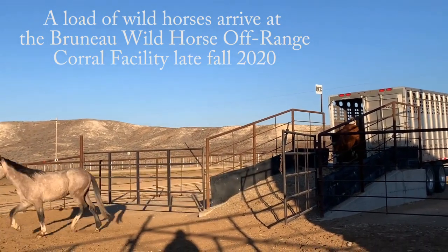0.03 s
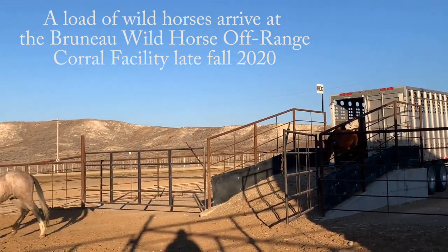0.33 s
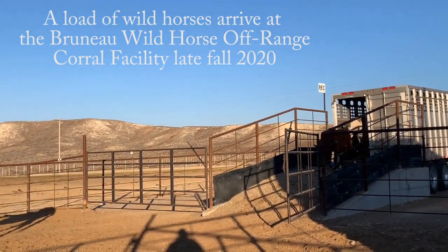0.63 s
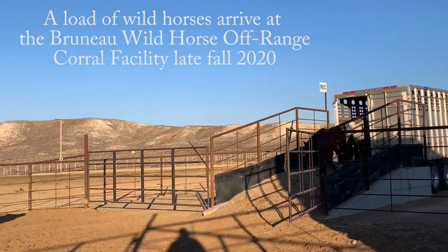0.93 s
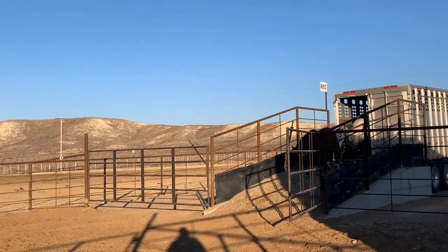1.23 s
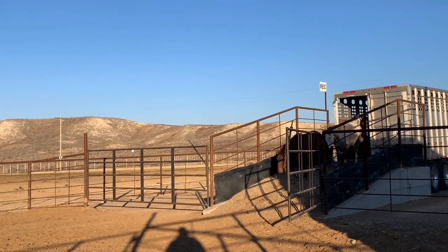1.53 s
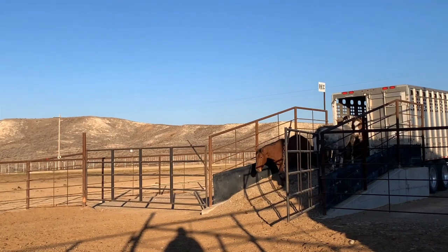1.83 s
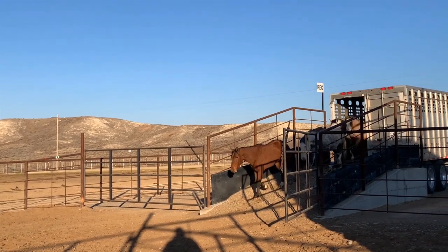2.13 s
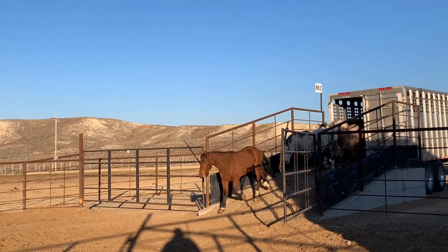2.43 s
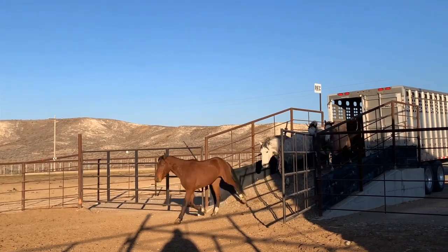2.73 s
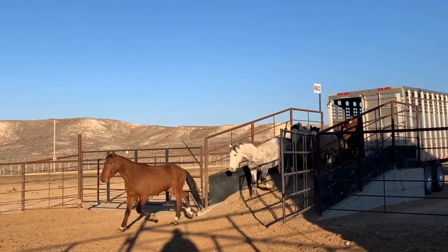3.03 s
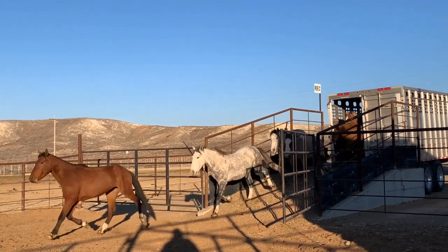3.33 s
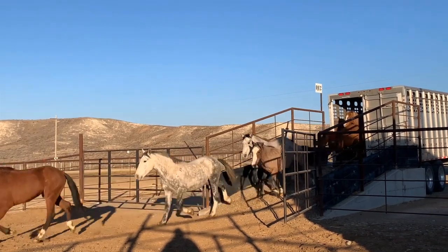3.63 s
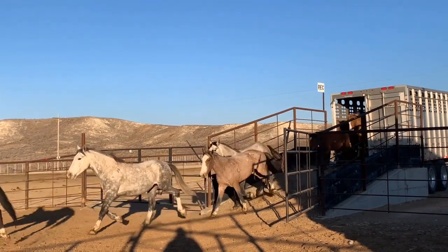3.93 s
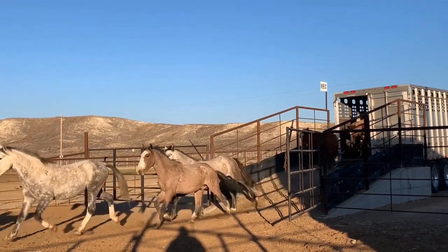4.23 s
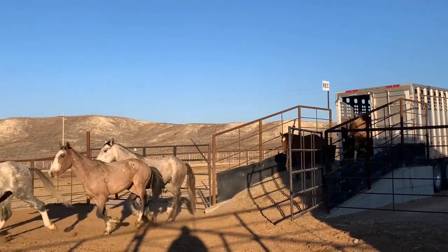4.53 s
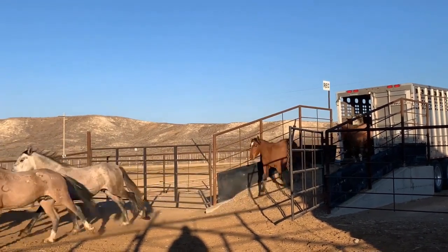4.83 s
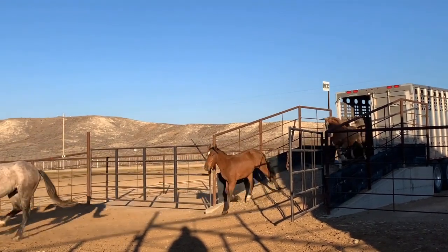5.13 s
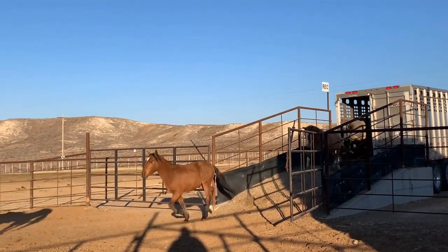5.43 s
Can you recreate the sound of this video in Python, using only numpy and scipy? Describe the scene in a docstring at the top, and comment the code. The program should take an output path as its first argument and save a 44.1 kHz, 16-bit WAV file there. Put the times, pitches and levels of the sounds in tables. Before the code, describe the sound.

Horses shuffle in a metal stock trailer, their hooves clopping lightly on the ramp and thumping on the deck. Then bouts of hard stamping make the floor boom and the walls rattle and bang, with the loudest near the end. Hooves crunch the dirt of the outdoor corral and spray sand to the right. Off to the left, a horse gives a hoarse squeal that turns clear and wavering. The stereo sound has a faint hiss underneath.

```python
"""A dirt corral, where horses crowd out of a metal stock trailer and down its ramp.
Hooves clop on the ramp and thump on the deck; in bouts of stamping the deck booms and the walls
rattle and bang. Scuffing hooves crunch clods and spray sand to the right, and a pipe rail rings faintly.
Off to the left a squeal starts hoarse, then clears and wavers."""
import sys
import numpy as np
from scipy import signal
from scipy.fft import rfft, irfft
from scipy.io import wavfile
from scipy.ndimage import uniform_filter1d

SR = 44100
rng = np.random.default_rng(int(sys.argv[2]) if len(sys.argv) > 2 else 0)


def transcribe(u):
    """Save the signal u as a 16-bit wav file named by the first command-line argument.

    u: samples, shape (n,) or (channels, n), limited to [-1, 1]; the rate is SR.
    q: integer samples, one column per channel.
    """
    v = np.clip(np.atleast_2d(u).T, -1, 1)
    q = np.round(v * 32767).astype(np.int16)
    wavfile.write(sys.argv[1], SR, q)


N = 246519
TIME = np.arange(N) / SR
FREQS = np.maximum(np.arange(N // 2 + 1) * SR / N, 1)

# Hoof on the ramp, weight on the deck. Each row: start in seconds, peak in dB, pitch in Hz.
RAMP_CLOPS = [(0.309, -47.5, 600), (0.338, -46.5, 620), (0.368, -46, 610), (0.524, -43.5, 604),
              (0.626, -51, 530), (0.747, -40.5, 687), (0.8, -41.5, 587), (0.965, -49.5, 630),
              (1.195, -43.5, 606), (1.228, -41, 540), (1.308, -38.5, 634), (1.44, -37.5, 560),
              (1.454, -43.5, 604), (1.658, -42.5, 540), (1.881, -23, 600), (2.045, -36.5, 570),
              (2.077, -40, 485), (2.156, -32, 585), (2.285, -40, 580), (2.319, -37.5, 663),
              (3.455, -36.5, 775)]
DECK_THUMPS = [(0.055, -47, 130), (0.552, -38, 173), (0.641, -41.5, 88), (0.75, -45, 119),
               (1.059, -40.5, 119), (1.122, -38, 106), (1.186, -30, 180), (1.314, -38, 168),
               (1.454, -34, 100), (1.601, -35, 192), (1.885, -28, 107), (1.899, -24, 183),
               (2.043, -39, 116), (2.154, -33, 139), (2.538, -13, 212), (2.559, -17.5, 139),
               (2.609, -29, 87), (2.677, -19.5, 247), (2.757, -18.5, 273), (2.838, -23.5, 146),
               (3.144, -31, 199), (3.234, -19.5, 177), (3.287, -22.5, 79), (3.327, -23.5, 159.5),
               (3.673, -26.5, 219), (3.698, -22, 211), (3.72, -27.5, 68), (4.66, -20, 72),
               (4.674, -14, 158.5), (4.72, -15.5, 167), (4.755, -12, 205), (4.785, -8.5, 151.6),
               (4.943, -1.5, 184.7), (4.992, -6, 209), (5.044, -14.5, 128), (5.192, -17.5, 186),
               (5.371, -22.5, 190), (5.51, -36, 143)]
# Hard stamping. Each row: start and end in seconds, levels of chassis, deck, panel and rattle in dB,
# sag of the boom in dB per second.
STAMPING_BOUTS = [ (2.528, 2.855, -29, -28.5, -39.5, -44.5, 17.5), (3.231, 3.46, -37, -35, -48.5, -49, 16),
                  (3.664, 3.806, -34.5, -35, -40.5, -42.5, 24),
                  (4.626, 4.838, -32.5, -20.5, -36, -43.5, 1.5),
                  (4.844, 4.955, -32.5, -27.5, -39, -42.5, 54), (4.946, 5.408, -20, -17.5, -30, -33, 43)]
# Blows on metal. Each row: start in seconds, level in dB, seconds to fade by 60 dB (t60).
WALL_KICKS = [(2.5324, -25.5, 0.33), (2.5609, -24.5, 0.21), (2.756, -36.5, 0.17), (3.6674, -62, 0.11),
              (3.706, -34, 0.073), (4.68, -34.5, 0.12), (4.75, -33.5, 0.15), (4.9351, -21.5, 0.28),
              (4.9559, -20.5, 0.19), (4.9759, -16.5, 0.13), (5.013, -21, 0.23)]
RAIL_KNOCKS = [(0.179, -66, 0.59), (0.7452, -67, 0.41), (1.2444, -70, 0.41), (1.859, -62, 0.42)]
# Hoof on stone or steel. Each row: start in seconds, tick in dB, body in dB, t60 in seconds.
HOOF_CLACKS = [(0.327, -70, -59.5, 0.14), (2.1032, -33, -58, 0.042), (2.5, -17.5, -55, 0.025),
               (3.709, -35.5, -53, 0.06), (3.906, -38, -68, 0.045), (4.099, -41, -65, 0.075),
               (5.351, -44, -36.5, 0.047), (5.3956, -41.5, -36.5, 0.054)]
# Hoof scuffing dirt. Each row: start in seconds, sand spray in dB, crunch in dB, t60 in seconds.
DIRT_SCUFFS = [(0.043, -81, -59.5, 0.2), (0.173, -58, -49, 0.41), (0.223, -59, -50.5, 0.21),
               (0.683, -55, -54.5, 0.39), (0.743, -44, -39.5, 0.22), (1.2186, -68, -52.5, 1),
               (1.2904, -49, -41.5, 0.1), (1.83, -48, -50, 0.34), (1.8886, -49.5, -39, 0.24),
               (2.1, -47, -46.5, 0.17), (2.1554, -47, -45.5, 0.16), (2.203, -49.5, -51.5, 0.17),
               (2.4857, -28, -36.5, 0.19), (2.503, -35.5, -32, 0.42), (2.722, -49.5, -47.5, 0.64),
               (3.11, -43.5, -77, 0.19), (3.396, -56, -38, 0.22), (3.5135, -44, -47, 0.11),
               (3.71, -46, -29.5, 0.11), (3.8525, -46, -56, 0.13), (3.979, -40.5, -54.5, 0.11),
               (4.415, -48, -58, 0.064), (4.465, -55, -79, 0.13), (4.513, -56, -53, 0.19),
               (4.6, -47, -43, 0.075), (4.9444, -24, -15.5, 0.36), (5.287, -52, -50, 0.38),
               (5.555, -62, -80.5, 0.13)]
# Hoof dragged through clods. Each row: start in seconds, length in seconds, crunch in dB.
HOOF_DRAGS = [(0.464, 0.16, -70), (1.037, 0.27, -71), (1.41, 0.26, -71.5), (2.313, 0.2, -58.5),
              (3.06, 0.23, -65), (3.792, 0.48, -72)]
# The long, clear squeal. Each row: time in seconds, pitch in Hz, level in dB.
SQUEAL_PATH = [(4.26, 1594, -61), (4.28, 1770, -49), (4.316, 1757, -49.5), (4.4, 1990, -58.5),
               (4.466, 1753, -52), (4.53, 1992, -57.5), (4.576, 1732, -47), (4.586, 1608, -53),
               (4.616, 1746, -41.5), (4.66, 1930, -35.5), (4.7, 1730, -42)]
# Short squeals. Each row: start and length in seconds, middle pitch in Hz, share by which the ends
# lie higher, lower voice in dB, upper voice in dB.
YELPS = [(3.361, 0.041, 1326, 0.05, -39.5, -52.5), (3.403, 0.0478, 1342, 0.06, -36, -44),
         (3.754, 0.039, 1405, 0.058, -33.5, -42.5), (4.751, 0.056, 1765, -0.088, -34.5, -63)]

# Fader moves. Each row: time in seconds, level in dB.
SHUFFLE_LEVEL = [(0, -57.5), (0.45, -50.5), (0.6, -48.5), (0.92, -55), (1.25, -45), (1.39, -54.5),
                 (1.57, -43), (1.8, -52), (1.95, -43), (2.48, -41), (2.88, -51.5), (3.05, -49.5),
                 (3.2, -40.5), (3.5, -47), (4.0, -49), (4.49, -49), (4.6, -35.5), (5.5, -50)]  # the deck under the restless herd
SAND_LEVEL = [(1.8, -85), (2.05, -71), (2.3, -63), (2.8, -75), (3.0, -68), (3.3, -61.5), (3.9, -58),
              (4.22, -64), (4.4, -56), (4.85, -58.5), (5.2, -69.5), (5.59, -65)]  # sand stirred up in the corral
RASP_LEVEL = [(3.32, -60), (3.4, -59), (3.6, -49), (4.02, -56)]  # the hoarse part of the squeal

# The tone colour of each layer. Each row: frequency in Hz, gain in dB.
CHASSIS_EQ = [(15, -54), (25, -16.5), (45, -7.5), (60, -1), (71, 1), (85, -4), (105, -3.5), (140, -14.5),
              (300, -78.5)]
DECK_BOOM_EQ = [(50, -41.5), (100, -2.5), (140, -0.5), (210, 2.5), (260, 1), (420, -15), (600, -31),
                (900, -78)]
DECK_MURMUR_EQ = [(15, -45.5), (25, -13), (86, 3.5), (135, 0), (182, -0.5), (259, -9.5), (324, -16.5),
                  (373, -21.5), (420, -48), (550, -61), (920, -120)]
PANEL_EQ = [(180, -18.5), (300, 6.5), (370, -8), (440, 1.5), (620, 2), (820, -1), (1000, -2), (1200, -11),
            (1600, -19), (2600, -98)]
RATTLE_EQ = [(600, -37), (1000, -14), (1400, 2.5), (2000, 0), (2500, -5.5), (3500, -6.5), (5500, -16.5),
             (8000, -20), (11000, -30.5), (14000, -33), (16000, -28)]
CLACK_EQ = [(600, -11), (1400, 6), (3000, 5.5), (5000, 2), (7000, 0), (10000, -21), (16000, -28)]
CRUNCH_EQ = [(400, -38), (700, 4.5), (1000, -2.5), (1700, -2.5), (2400, -9), (3200, -8.5), (4500, -15),
             (6300, -15.5), (8000, -17), (11000, -20)]
SAND_EQ = [(4000, -34.5), (7500, -23), (8800, 3.5), (10300, 0.5), (12000, -3.5), (13500, -4.5), (15000, -7),
           (16000, -5.5)]
HISS_EQ = [(100, -2), (500, 5), (1500, 4), (5000, -7), (8000, -2), (11000, 1), (13500, 1.5), (14500, 14),
           (16000, 5.5)]
# Stereo width: centred bass, wide treble. Each row: frequency in Hz, side over mid in dB.
STEREO_WIDTH = [(250, -78), (420, -68.5), (600, -39), (1000, -7.5), (1500, -2.5), (4000, -1), (10000, 3)]

# Resonances of deck, walls and hoarse voice. Each row: frequency in Hz, width in Hz, gain in dB.
DECK_MODES = [(121.5, 34, -3), (148.3, 19.2, -1), (184, 11.5, -3.5), (214.8, 19, -5), (311, 64, -8.5),
              (440, 130, -9.5)]
WALL_MODES = [(475, 24, 1.5), (553, 63, 0), (610, 24, -21), (726, 8.1, -7.5), (771, 41, -5),
              (1360, 51, -12), (1814, 120, -2.5), (2140, 8.9, -4), (2425, 130, 4), (3220, 26, -16.5),
              (3495, 17, 0)]
RASP_MODES = [(1110, 70, -32), (1370, 25, 13), (1674, 21, 16), (1970, 53, 5), (2184, 44, -1.5),
              (2630, 79, -8), (3280, 51, 3.5)]
# The partials of the pipe rail. Each row: frequency in Hz, gain in dB.
RAIL_MODES = [(1015, 10), (1740, 8), (2420, -8), (2825, -1), (3740, -7), (5410, -28), (5935, -3.5)]


def hooves():
    """Single steps: the hard clop of the horn and the thump of the weight."""
    return knocks(RAMP_CLOPS, cycles=1.69, glide=0.24) + knocks(DECK_THUMPS, cycles=1.77, glide=0.079)


def stamping(metal_sag_ratio=1.14):
    """Bouts rock the chassis, boom in the deck and shake panels and fittings; kicks crash on top."""
    chassis = evened(coloured(grains(400, 1.5), CHASSIS_EQ), 0.035)
    deck = evened(coloured(grains(400, 1.6), DECK_BOOM_EQ, resonances(DECK_MODES)), 0.014)
    panel_ring = sheet_metal(ring_db=1, t60=0.036, bed_db=-2)
    panel = evened(coloured(scattered(1200, 1.3), PANEL_EQ, panel_ring), 0.024)
    fittings = scattered(1500, 2.2)
    out = 0
    for start, end, chassis_db, deck_db, panel_db, rattle_db, sag_db_per_s in STAMPING_BOUTS:
        # the walls ring with a slightly different random colour in each bout
        wall_ring = sheet_metal(ring_db=-4, t60=0.12, bed_db=8)
        rattle = evened(coloured(fittings, RATTLE_EQ, wall_ring), 0.011)
        boom = from_db(chassis_db) * chassis + from_db(deck_db) * deck
        metal = from_db(panel_db) * panel + from_db(rattle_db) * rattle
        # hit at once, sag steadily, stop short
        sag_db = sag_db_per_s * np.clip(TIME - start, 0, end - start)
        out = out + gate(start, end, 0.0044, 0.013) * from_db(-sag_db) * boom
        out = out + gate(start, end, 0.0048, 0.0043) * from_db(-metal_sag_ratio * sag_db) * metal
    return out + wall_kicks(panel)


def wall_kicks(panel, drum_hz=412):
    """A kick drums on the sheet metal, shakes the panel and sets off hard impacts that ring on."""
    wall_ring = sheet_metal(ring_db=-4, t60=0.17, bed_db=6)
    crash = evened(coloured(scattered(500, 2.0), RATTLE_EQ, wall_ring), 0.0054)
    drum = knocks([(start, db + 0.5, drum_hz) for start, db, _ in WALL_KICKS], cycles=2.6, glide=0.071)
    return drum + bursts(WALL_KICKS, attack=0.001) * (crash + from_db(1.5) * panel)


def clacks(left_lag_s=0.000177):
    """Hard, dry hoof contacts: a gritty tick over a short metallic body."""
    starts, tick_db, body_db, t60 = np.transpose(HOOF_CLACKS)
    grit = evened(coloured(grains(5700, 1.5), SAND_EQ), 0.003)
    metal = coloured(scattered(18000, 0), CLACK_EQ)
    tick = bursts(zip(starts, tick_db, t60), attack=0.00053) * grit
    body = bursts(zip(starts, body_db, t60), attack=0.00047) * metal
    return body + np.array([delayed(tick, left_lag_s), tick])


def dirt(left_lag_s=0.0001788, crumble_db=-80.5):
    """Hooves crush clods around the ramp and throw sand off to the right."""
    sand_db, = automation(SAND_LEVEL)
    starts, spray_db, crunch_db, t60 = np.transpose(DIRT_SCUFFS)
    drags = sum(from_db(db) * arch(start, length) for start, length, db in HOOF_DRAGS)
    crush = from_db(crumble_db) + drags + bursts(zip(starts, crunch_db, t60), attack=0.0082)
    spray = from_db(sand_db) + bursts(zip(starts, spray_db, t60), attack=0.0014)
    wall_ring = sheet_metal(ring_db=1, t60=0.043, bed_db=12)
    crunch = crush * evened(coloured(scattered(3000, 3.4), CRUNCH_EQ, wall_ring), 0.017)
    sand = spray * evened(coloured(grains(3000, 0.9), SAND_EQ), 0.015)
    return crunch + np.array([delayed(sand, left_lag_s), sand])


def squeal(right_lag_s=0.00043):
    """Hoarse noise in narrow, bending resonances, giving way to short yelps and one long, clear cry."""
    rasp_db, = automation(RASP_LEVEL)
    breath_eq = [(600, -28), (1100, 3), (3300, 1), (5000, -21)]
    breath = coloured(rng.standard_normal(N), breath_eq, resonances(RASP_MODES))
    rasp_level = gate(RASP_LEVEL[0][0], RASP_LEVEL[-1][0], 0.03, 0.027) * from_db(rasp_db)
    rasp = rasp_level * evened(wavering(breath, depth=0.018), 0.042)
    yelps = sum(yelp(*row) for row in YELPS)
    long_cry = np.sqrt(2) * cry(SQUEAL_PATH, octave_db=-31, jitter=0.009, shimmer_db=2.5)
    voice = rasp + yelps + long_cry
    return np.array([voice, delayed(voice, right_lag_s)])


def yelp(start, length, hz, bend, lower_db, upper_db, upper_ratio=1.455):
    """Two rough voices bend together along a parabola."""
    path = [(start + length * (u + 1) / 2, hz * (1 + bend * u ** 2)) for u in np.linspace(-1, 1, 5)]
    lower_path = [(s, f, lower_db) for s, f in path]
    upper_path = [(s, f * upper_ratio, upper_db) for s, f in path]
    lower = cry(lower_path, octave_db=-12, jitter=0.0169, shimmer_db=-1)
    upper = cry(upper_path, octave_db=-16, jitter=0.0156, shimmer_db=4.5)
    return lower + upper


def cry(path, octave_db, jitter, shimmer_db):
    """A thin tone with a weak octave, unsteady in pitch and strength."""
    hz, db = automation(path)
    tremble, flutter = unit_power(uniform_filter1d(rng.standard_normal((2, N)), SR // 250))
    pitch = uniform_filter1d(hz, SR // 60) * (1 + jitter * tremble)
    phase = 2 * np.pi * np.cumsum(pitch) / SR
    level = gate(path[0][0], path[-1][0], 0.042, 0.0064) * from_db(db + shimmer_db * flutter)
    return level * (np.sin(phase) + from_db(octave_db) * np.sin(2 * phase))


def shuffling(calm_deck_db=-49.5, calm_panel_db=-65, panel_growth=1.36):
    """Many soft steps keep the deck murmuring; the harder they fall, the more the panels knock."""
    deck_db, = automation(SHUFFLE_LEVEL)
    panel_db = calm_panel_db + panel_growth * (deck_db - calm_deck_db)
    deck = evened(coloured(grains(400, 2.3), DECK_MURMUR_EQ), 0.013)
    panel = evened(coloured(grains(1200, 0.61), PANEL_EQ), 0.015)
    return from_db(deck_db) * deck + from_db(panel_db) * panel


def rail():
    """A lightly knocked steel pipe rings in its modes, each a little out of step between the ears."""
    count = len(RAIL_MODES)
    phases = rng.uniform(0, 2 * np.pi, (count, 1, 1)) + rng.normal(0, 0.36, (count, 2, 1))
    ring = sum(from_db(db) * np.sin(2 * np.pi * hz * TIME + phase)
               for (hz, db), phase in zip(RAIL_MODES, phases))
    return bursts(RAIL_KNOCKS, attack=0.0025) * ring


def hiss():
    """A faint, steady bed of air."""
    return from_db(-64) * coloured(scattered(24000, 0), HISS_EQ)


def knocks(rows, cycles, glide):
    """Bending waves arrive treble first, so each blow is a few cycles that slide down in pitch."""
    out = np.zeros(N)
    for start, db, hz in rows:
        onset = int(start * SR)
        age = TIME[:min(SR // 5, N - onset)]
        progress = age * hz / cycles  # 1 at the height of the blow
        pitch = hz * (1 + glide * (np.exp(1 - progress) - 1) / 2)
        swell = (progress * np.exp(1 - progress)) ** 3
        phase = 2 * np.pi * (np.cumsum(pitch) / SR + rng.random())
        out[onset:onset + len(age)] += from_db(db) * swell * np.sin(phase)
    return out


def sheet_metal(ring_db, t60, bed_db):
    """Response of the walls: a dense, random bed of short modes, with a few that ring out."""
    age = TIME[:SR // 2]
    tail = rng.standard_normal(len(age)) * from_db(-60 * age / t60)
    bed = 1 + from_db(bed_db) * rfft(tail / np.linalg.norm(tail), N)
    return bed * (1 + from_db(ring_db) * sum(resonances([mode]) for mode in WALL_MODES))


def resonances(modes):
    """Summed response of modes, neighbours opposite in sign."""
    return sum((-1) ** k * from_db(db) / (1 + 1j * (FREQS ** 2 - hz ** 2) / (width * FREQS))
               for k, (hz, width, db) in enumerate(modes))


def grains(per_s, spread_db):
    """Random small contacts of uneven size."""
    sizes = from_db(spread_db * np.minimum(rng.exponential(1, N), 4)) * rng.standard_normal(N)
    return unit_power(sizes * (rng.random(N) < per_s / SR))


def scattered(per_s, spread_db):
    """Grains spread across the stereo field, at equal power in each ear."""
    width = from_db(eq_curve(STEREO_WIDTH))
    mid = irfft(rfft(grains(per_s, spread_db)) / np.hypot(1, width), N)
    side = irfft(rfft(grains(per_s, spread_db)) * width / np.hypot(1, width), N)
    return np.array([mid + side, mid - side])


def coloured(x, eq, resonance=1):
    """Give a sound the colour of a body, at unit power."""
    return unit_power(irfft(rfft(x) * from_db(eq_curve(eq)) * resonance, N))


def evened(x, seconds):
    """A leveller: keeps the power steady over spans of this length."""
    power = np.mean(np.atleast_2d(x) ** 2, axis=0)
    size = max(int(seconds * SR), 8)
    return x / np.sqrt(uniform_filter1d(uniform_filter1d(power, size), size) + 1e-4)


def wavering(x, depth):
    """Bend all pitches together, a few times a second."""
    bend = unit_power(uniform_filter1d(uniform_filter1d(rng.standard_normal(N), SR // 25), SR // 25))
    return np.interp(np.cumsum(1 + depth * bend) % N, np.arange(N), x)


def bursts(rows, attack):
    """Joint envelope of blows that swell quickly and die away."""
    power = np.zeros(N)
    for start, db, t60 in rows:
        onset = int(start * SR)
        age = TIME[:min(SR, N - onset)]
        envelope = from_db(db - 60 * age / max(t60, 0.01)) * (1 - np.exp(-age / attack))
        power[onset:onset + len(age)] += envelope ** 2
    return np.sqrt(power)


def gate(start, end, rise, fall):
    """Fully open from start to end, with short fades outside."""
    return np.clip(1 + (TIME - start) / rise, 0, 1) * np.exp(-np.maximum(TIME - end, 0) / fall)


def arch(start, length):
    """A swell that rises and falls once."""
    return np.sin(np.pi * np.clip((TIME - start) / length, 0, 1))


def delayed(x, lag_s):
    """The same sound at the farther ear."""
    return np.interp(TIME - lag_s, TIME, x)


def automation(rows):
    """Each column of a timed curve at every sample."""
    times, *columns = np.transpose(rows)
    return [np.interp(TIME, times, column) for column in columns]


def eq_curve(points):
    """Gain in dB at every frequency."""
    hz, db = np.transpose(points)
    return np.interp(np.log(FREQS), np.log(hz), db)


def from_db(db):
    """Decibels to gain."""
    return 10 ** (np.asarray(db) / 20)


def unit_power(x):
    """Scale to an RMS of one."""
    return x / np.sqrt(np.mean(x ** 2) + 1e-20)


def scene():
    """The mix: trailer in front, then dirt, squeal and a faint hiss."""
    trailer = hooves() + stamping() + clacks() + shuffling() + rail()
    return trailer + dirt() + squeal() + hiss()


def record(dry, ceiling=1.05, cutoff_hz=16000):
    """Soft clipping rounds the peaks and a steep low-pass cuts the top."""
    lowpass = signal.ellip(10, 0.2, 80, cutoff_hz, fs=SR, output="sos")
    return signal.sosfilt(lowpass, ceiling * np.tanh(dry / ceiling))


dry = scene()
out = record(dry)
transcribe(out)
```